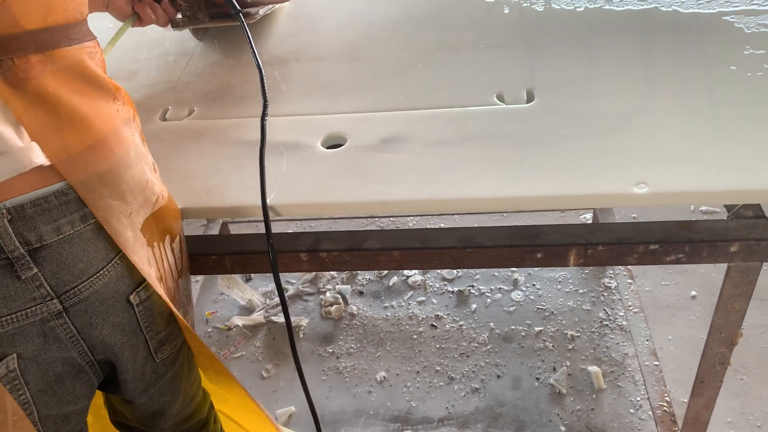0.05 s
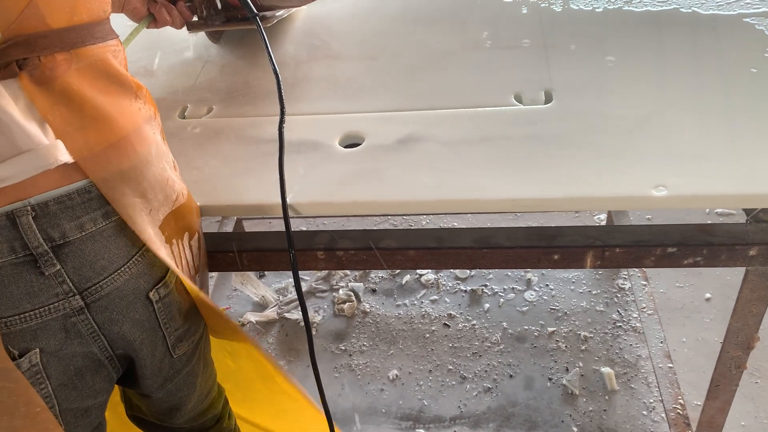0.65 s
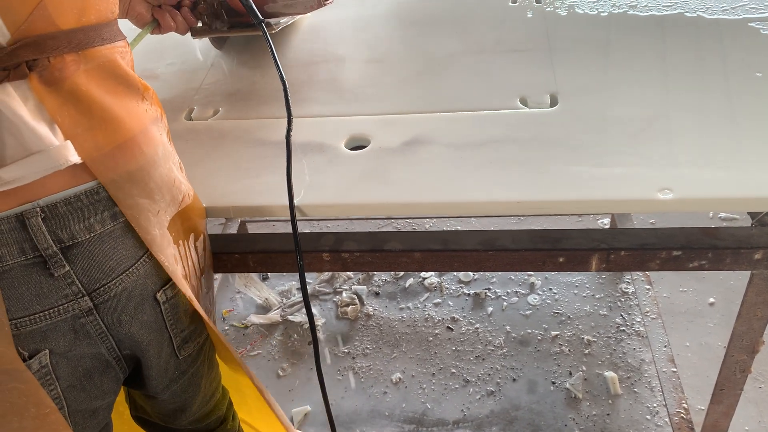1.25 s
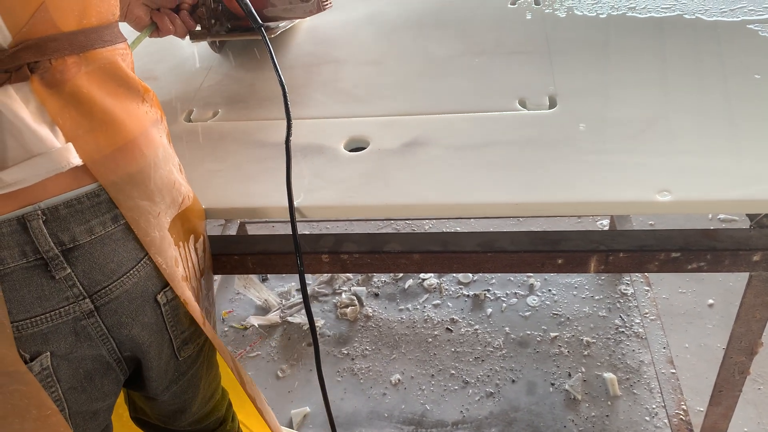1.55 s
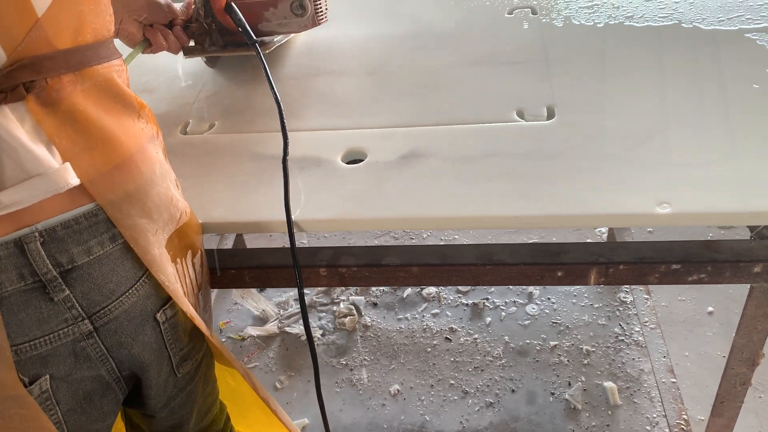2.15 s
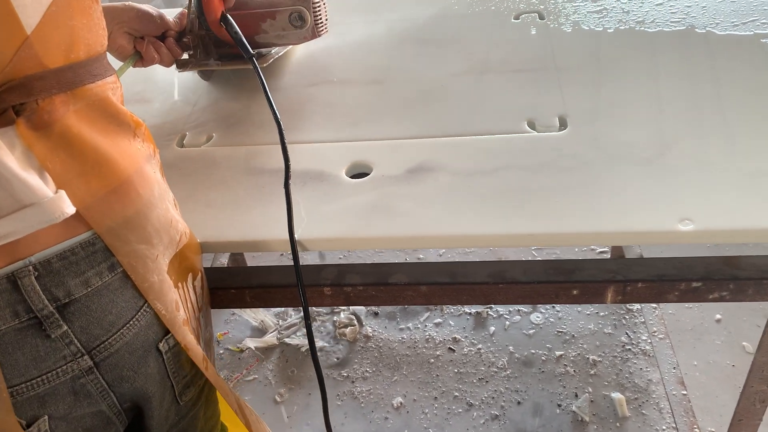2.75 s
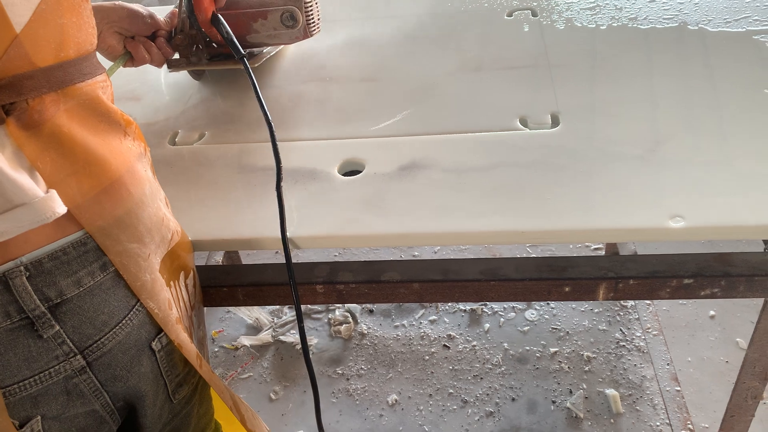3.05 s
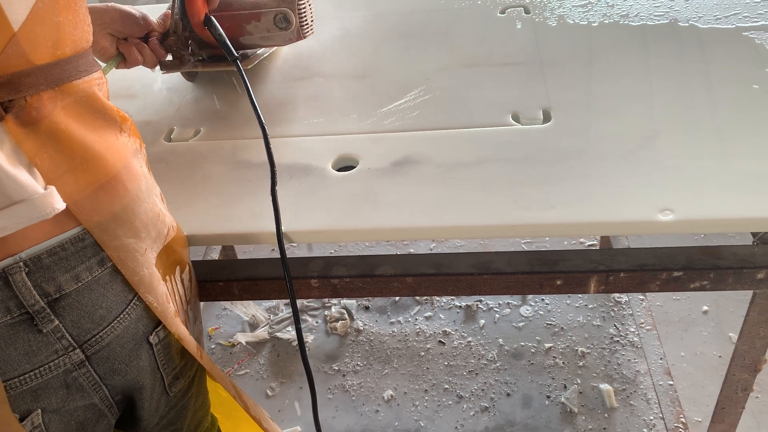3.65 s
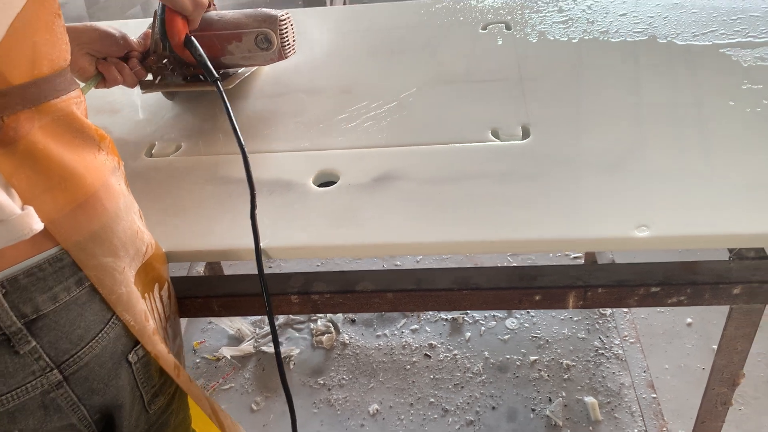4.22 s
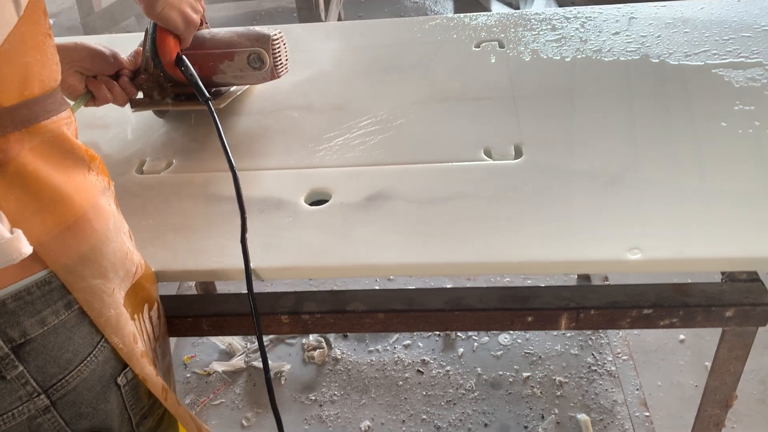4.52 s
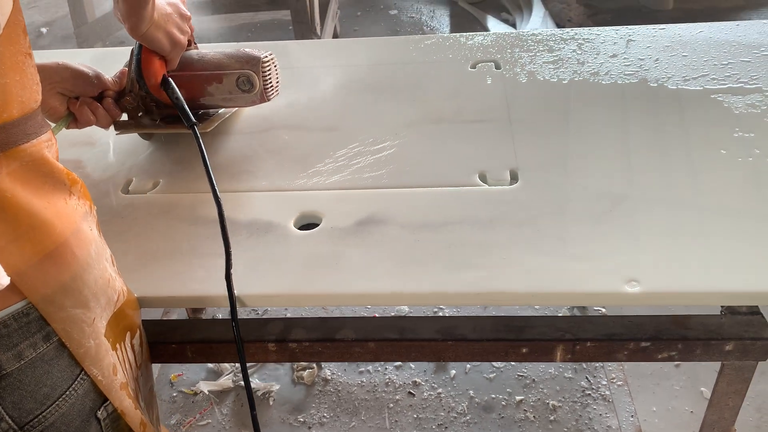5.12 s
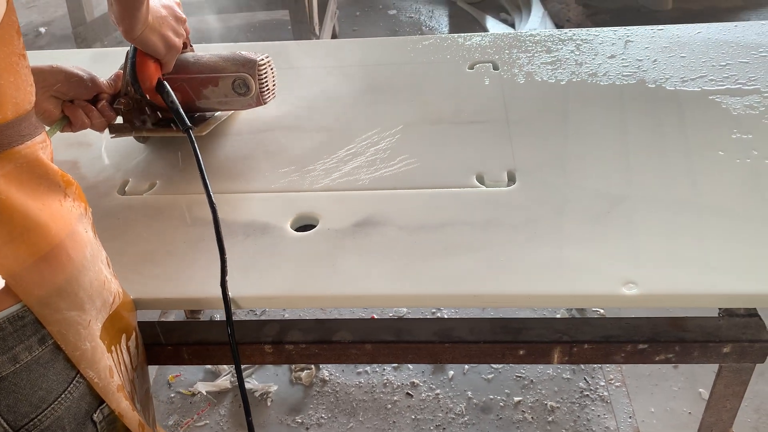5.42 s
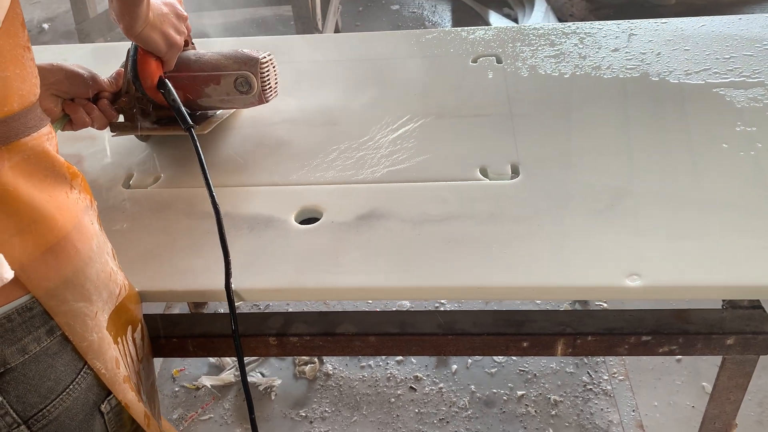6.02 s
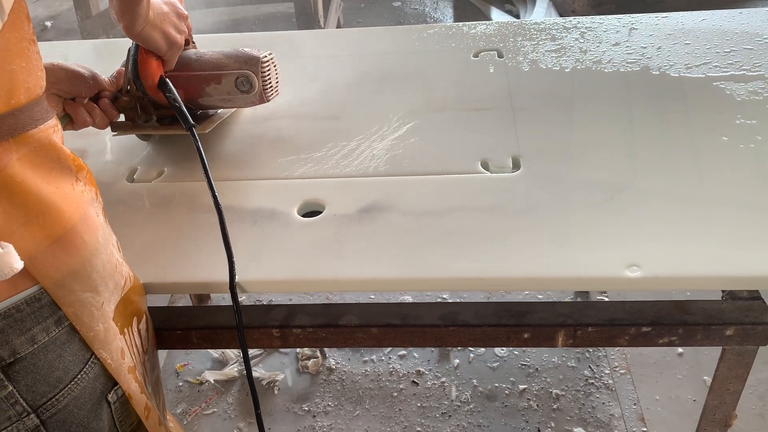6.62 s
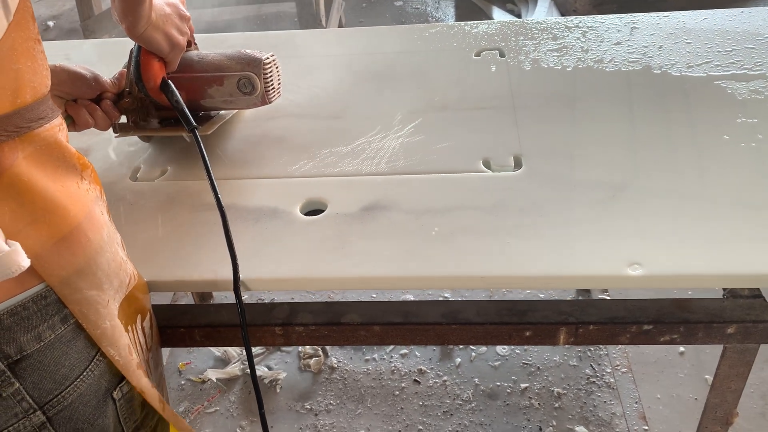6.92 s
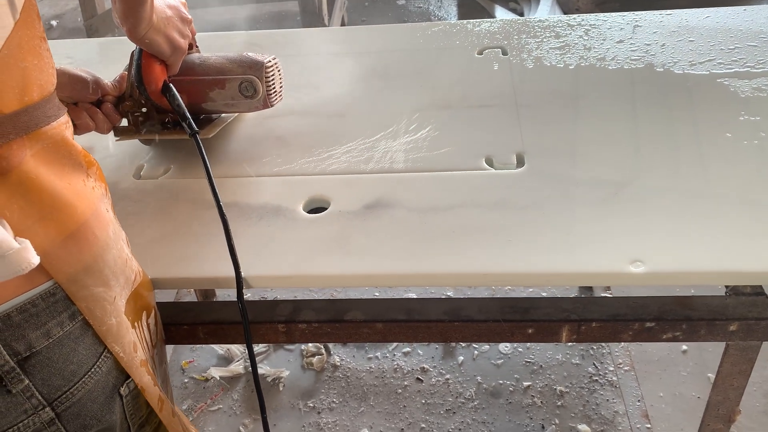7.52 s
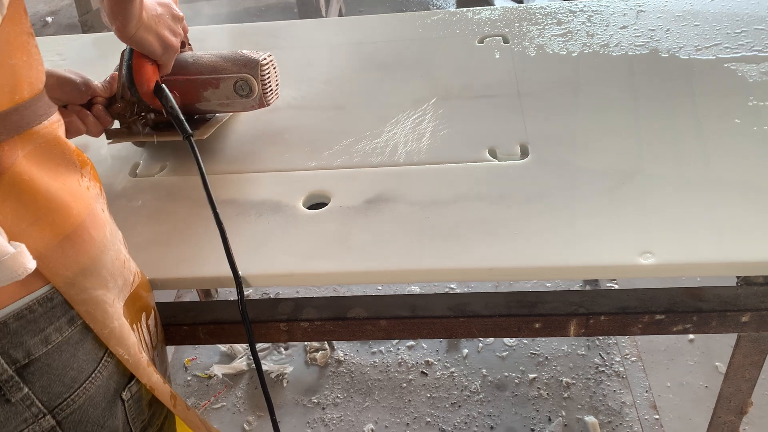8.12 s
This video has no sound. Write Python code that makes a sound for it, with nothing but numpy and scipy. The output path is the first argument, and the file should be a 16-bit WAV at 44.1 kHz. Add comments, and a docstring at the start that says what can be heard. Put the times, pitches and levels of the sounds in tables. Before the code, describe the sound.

A handheld electric cutter whines steadily as it grinds through wet glass, with a gritty hiss, high squeals and brief squeaks.

```python
"""A hand-held electric cutter pushes its diamond blade through a wet glass slab in a workshop.
Motor and gears whine on multiples of the blade speed, which sags as the cut deepens. The rim rubs the
same bumps on every turn, rasping and making blade and slot ring; grit hisses, and the blade squeals,
screeches and catches in short squeaks. Underneath sit fan rush, churning water and mains hum,
with a few soft puffs of air on the microphone early on."""
import sys
import numpy as np
from scipy import signal
from scipy.fft import rfft, irfft
from scipy.io import wavfile
from scipy.ndimage import uniform_filter1d

SR = 44100
rng = np.random.default_rng(int(sys.argv[2]) if len(sys.argv) > 2 else 0)


def to_wav(sig):
    """Store sig (one row per channel, or 1-D mono) as 16-bit WAV at the path in sys.argv[1].

    Samples outside -1..1 are clipped; the rate is SR.
    """
    pcm = np.clip(np.atleast_2d(sig), -1, 1) * 32767
    pcm = np.round(pcm).astype(np.int16)
    wavfile.write(sys.argv[1], SR, pcm.T)  # frames by channels


N = 368676
TIME = np.arange(N) / SR
FREQ = np.maximum(np.arange(N // 2 + 1) * SR / N, 1)

# blade speed (time [s], speed [turns/s])
BLADE_SPEED = [(0.0, 117.83), (0.26, 116.83), (0.46, 119.32), (0.74, 119.67), (1.0, 117.8), (1.18, 114.9),
               (1.37, 115.62), (1.49, 114.0), (1.97, 112.43), (2.09, 113.45), (2.65, 113.37),
               (2.79, 111.65), (3.02, 113.07), (3.46, 111.38), (3.88, 111.42), (4.48, 112.25),
               (4.76, 111.5), (5.06, 112.35), (5.48, 111.18), (5.69, 111.72), (5.92, 110.73),
               (6.43, 110.98), (6.99, 110.95), (7.48, 112.22), (7.96, 110.18), (8.38, 112.45)]
# feed of the tool (time [s], depth of cut [0-1])
CUT_DEPTH = [(1.0, 0.08), (1.4, 0.23), (2.5, 0.42), (3.2, 0.5), (4.1, 0.58), (4.7, 0.9)]
# motor, fan and gear tones (multiple of blade speed, level at depth 0 [dB], level at depth 1 [dB])
MOTOR_TONES = [(1, -65.5, -66), (2, -53.5, -51.5), (4, -53, -86), (5, -54.5, -80), (7, -52, -76),
               (9, -53.5, -53.5), (11, -59, -70), (12, -51, -70), (13, -51, -72), (14, -57, -56.5),
               (15, -59, -52), (17, -70, -51), (18, -59, -57), (19, -60, -66), (20, -52, -56),
               (21, -54, -65), (22, -56, -52), (23, -62, -58), (24, -55, -76), (25, -55, -58),
               (26, -51, -51), (27, -43, -53), (28, -48, -57), (29, -44, -46), (30, -54, -56),
               (31, -59, -48), (32, -61, -57), (33, -50, -55), (35, -54, -55), (36, -56, -57),
               (37, -60, -59), (38, -60, -58), (42, -70, -58), (43, -60, -62), (45, -57, -64),
               (46, -62, -59), (50, -61, -56), (52, -52, -62), (53, -57, -55), (58, -62, -49),
               (62, -59, -50), (63, -56, -53), (65, -58, -45), (66, -49, -54), (67, -53, -43),
               (69, -52, -49), (70, -50, -53), (71, -50, -47)]
# housing whistle before the bite (multiple of blade speed, level [dB])
WHISTLE_TONES = [(13, -46), (14, -42), (15, -49)]
# gear tones under load (multiple of blade speed, relative level [dB])
STRAIN_TONES = [(13, -56), (18, -55), (33, -52), (37, -52), (42, -51), (43, -57), (46, -56), (51, -51),
                (70, -46)]
# their swell as the tool is pushed (time [s], gain [dB])
STRAIN_GAIN = [(0, -40), (4.5, -34), (5.0, -8), (5.5, -7), (6.2, -39), (7.3, -9), (7.9, 1), (8.36, 2.5)]
# tone colour of grit, rim and fan (frequency [Hz], relative density [dB/Hz])
GRIT_SPECTRUM = [(2000, -73.5), (5300, -63.5), (6000, -47), (7000, -44), (8500, -45.5), (9700, -33),
                 (10900, -38.5), (11600, -45.5), (12300, -35), (12900, -39.5), (13600, -37.5),
                 (14400, -38.5), (15300, -36), (16500, -40)]
RIM_SPECTRUM = [(300, -100), (650, -90.5), (1800, -90), (2500, -86), (3300, -75), (4100, -79), (4700, -86),
                (5300, -86.5), (5700, -100), (7000, -100), (8500, -84), (11000, -69.5), (16000, -71)]
FAN_SPECTRUM = [(25, -110), (60, -85.5), (100, -90), (160, -92), (240, -82), (320, -99), (410, -82.5),
                (500, -81.5), (750, -78), (950, -78), (1300, -76.5), (2150, -82), (2700, -80), (3250, -75),
                (3800, -79), (4400, -87), (5300, -85), (9000, -105)]
# resonances of blade, slot, housing and water (frequency [Hz], half width [Hz], relative level [dB])
BLADE_MODES = [(3460, 130, -4), (3930, 220, -8), (6325, 220, 1.5)]
SQUEAL_MODES = [(10644, 430, 0)]
SLOT_MODES = [(2630, 820, -11.5), (4710, 870, -8.5), (5780, 360, -2.5), (7490, 510, 1.5), (7845, 73, 4.5)]
HOUSING_MODES = [(1724, 117, -0.69), (1661, 35, 0.58)]
WATER_MODES = [(665, 200, 0)]
# envelopes of blade ring, squeal, water and screech (time [s], relative level [dB])
RING_ENVELOPE = [(0.0, -46), (1.3, -30), (1.44, -33), (2.49, -33.5), (2.79, -39.5), (4.8, -32.5),
                 (5.8, -37.5), (7.06, -32), (8.36, -35.5)]
SQUEAL_ENVELOPE = [(0.0, -33), (0.11, -28), (0.37, -35.5), (0.49, -28.5), (2.4, -30.5), (2.7, -55),
                   (2.82, -30), (4.07, -35), (4.73, -27.5), (5.49, -29), (5.61, -26), (6.54, -27.5),
                   (7.82, -27), (8.36, -29)]
WATER_ENVELOPE = [(0, -53), (2.0, -60.5), (2.5, -52), (5.5, -52.5), (6.1, -56.5), (8.36, -57)]
SCREECH_ENVELOPE = [(0.2, -60), (0.5, -45.5), (0.9, -45), (1.25, -39.5), (1.7, -42), (2.5, -41), (2.9, -44),
                    (3.6, -45.5), (4.8, -43.5), (5.8, -51), (7.1, -44), (7.7, -51), (8.36, -52)]
# puffs of air (time [s], half length [s], level [dB])
AIR_PUFFS = [(0.02, 0.068, -48), (0.314, 0.091, -52.5), (.53, 0.065, -53), (0.77, .03, -52),
             (0.934, 0.099, -57), (1.064, .025, -57), (1.296, 0.12, -56), (1.615, 0.021, -58)]
# the blade binds and sings (start [s], end [s], multiple of blade speed, level [dB])
BLADE_BINDS = [(0.4, 1.25, 20, -45), (0.4, 1.05, 18, -49), (0.55, 0.85, 27, -41), (1.15, 1.6, 27, -44),
               (1.15, 1.65, 21, -48), (1.1, 1.45, 36, -46.5), (1.2, 1.65, 29, -42), (1.45, 2.6, 35, -49),
               (1.55, 2.55, 36, -49), (1.5, 2.4, 30, -48), (2.0, 2.65, 27, -43), (2.0, 3.1, 29, -41.5),
               (4.9, 5.15, 36, -46), (4.9, 5.15, 29, -45), (7.65, 8.36, 36, -47), (7.65, 8.05, 58, -42),
               (7.65, 8.0, 67, -41), (7.9, 8.36, 27, -45.5), (8.2, 8.4, 29, -42)]
# the blade catches and squeaks (time [s], relative peak level [dB])
BLADE_CATCHES = [(0.4855, -13), (0.637, -16), (0.8565, -18), (1.4231, -11), (4.1358, -13), (5.7407, -17),
                 (5.793, -13), (6.187, -7.5), (7.551, -10), (7.6834, -22), (7.8964, -16), (8.087, -14)]
# two microphone ports (frequency [Hz], direct share [0-1], left lag [rad], left minus right [dB])
MIC_PORTS = [(60, 1, 0.3, 0.3), (149, 0.85, 0.5, -1), (260.3, 0.6, -3.5, 1.5), (518, 0.67, 0.5, -0.5),
             (535, 0, -1, -3.5), (730, 0.88, -1.62, 1), (1380, 0.61, -2, -1), (1770, 0.44, -1.6, 2),
             (2050, 0.7, -3.2, -1), (2450, 0.7, -3.7, 0), (3150, 0.6, -3.5, -0.5), (3700, 0.55, -5.2, -3),
             (4300, 0.6, -6.2, -1), (5150, 0.4, -6.6, -4), (5550, 0.4, -4.6, -4.5),
             (5850, 0.85, -5.9, -1.5), (6400, 0.98, -6.3, 0), (7100, 0.7, -6.7, 4), (7400, 0.6, -5.1, 5),
             (7900, 0.92, -3.6, 1.3), (11030, 1, -0.5, -1), (13070, 0.93, 3, 1), (15970, 0.97, 5.5, -1.5)]

BITE_S, BITE_RISE_S = 0.17, 0.27  # the rim skims the glass, then bites
# gains that ride the feed (skimming [dB], bitten at depth 0 [dB], at depth 1 [dB])
HISS_DB, RASP_DB = (-26, -24, -28), (-0.5, -5, 2.5)
SLOT_DB, HOWL_DB = (-58, -40.5, -31.5), (-50, -52, -48.5)
SKIM_DB = -4  # blade ring and upper gear whine sit lower before the bite


def undb(db):
    """Decibels to gain."""
    return 10 ** (np.asarray(db) / 20)


def curves(table):
    """One envelope per value column of a timed table, in straight ramps."""
    times, *columns = np.transpose(table)
    return [np.interp(TIME, times, column) for column in columns]


def unit(x):
    """Scale to rms 1."""
    return x / np.sqrt(np.mean(x ** 2))


def noise():
    """White noise of rms 1."""
    return rng.standard_normal(N)


def drift(rate_hz):
    """Smooth random modulation of rms 1, mostly slower than rate_hz."""
    return unit(irfft(rfft(noise()) / (1 + (FREQ / rate_hz) ** 2), N))


def turn_drift(turns):
    """Random modulation of rms 1 that ramps to a new value on every turn."""
    draws = rng.standard_normal(2048)
    return unit(np.interp(turns, np.arange(draws.size), draws))


def swell(peak_s, half_s):
    """Bell-shaped envelope."""
    return np.exp(-np.minimum(((TIME - peak_s) / half_s) ** 2, 20))


def colour(x, spectrum):
    """EQ that gives white sound of rms 1 a spectrum in dB per Hz."""
    hz, db = np.transpose(spectrum)
    gain = undb(np.interp(np.log(FREQ), np.log(hz), db))
    return irfft(rfft(x) * gain, N) * np.sqrt(SR / 2)


def resonate(x, modes):
    """Drive a bank of steep resonances; rms 1."""
    response = sum(undb(db) / (1 + 1j * (FREQ - hz ** 2 / FREQ) / (2 * half_width)) ** 2
                   for hz, half_width, db in modes)
    return unit(irfft(rfft(x) * response, N))


def feed():
    """How firmly the rim has bitten and how deep it is, both 0-1."""
    bite = np.clip((TIME - BITE_S) / BITE_RISE_S, 0, 1)
    return bite, np.clip(curves(CUT_DEPTH)[0], 0, 1)


def feed_gain(levels_db):
    """A layer's fader as the blade goes from skimming to biting to cutting deep."""
    skim_db, bite_db, deep_db = levels_db
    bite, depth = feed()
    return undb(skim_db + bite * (bite_db - skim_db) + depth * (deep_db - bite_db))


def motor_partials(upper_above=17):
    """Motor, gears and housing whistle, locked to the shaft, as (multiple, level [dB])."""
    bite, depth = feed()
    skim_db = SKIM_DB * (1 - bite)
    strain_db = curves(STRAIN_GAIN)[0]
    running = [(order, shallow_db + depth * (deep_db - shallow_db) + skim_db * (order > upper_above))
               for order, shallow_db, deep_db in MOTOR_TONES]
    whistle = [(order, db - 60 * bite ** 3) for order, db in WHISTLE_TONES]
    strain = [(order, db + strain_db) for order, db in STRAIN_TONES]
    return running + whistle + strain


def shaft_tone(turns, order, db, sway_rad=0.45, rattle_rad=0.3, waver_db=2.6):
    """One multiple of the shaft in stereo; higher ones sway, rattle and waver more as the tool moves."""
    unsteady = min(order / 30, 1)
    mean_hz = order * turns[-1] / TIME[-1]
    port_hz, _, port_lag, port_db = np.transpose(MIC_PORTS)
    pan_db = np.interp(mean_hz, port_hz, port_db)
    lag = np.interp(mean_hz, port_hz, port_lag) + sway_rad * unsteady * turn_drift(turns / 45)
    phase = 2 * np.pi * (order * turns + rng.random()) + rattle_rad * unsteady * turn_drift(turns)
    gain = undb(db + waver_db * unsteady * turn_drift(turns / 5))
    return np.sqrt(2) * gain * np.sin([phase - lag, phase]) * undb([[pan_db / 2], [-pan_db / 2]])


def whine(turns, partials):
    """Voice each multiple of the shaft once, with the power of all that drive it."""
    power = {}
    for order, db in partials:
        power[round(order)] = power.get(round(order), 0) + undb(db) ** 2
    return sum(shaft_tone(turns, order, 10 * np.log10(total)) for order, total in power.items())


def rim_bumps(turns, wear_turns=9, points=320, steps=1024):
    """Bumps round the rim come back on every turn and slowly wear into a new pattern."""
    rows = int(turns[-1]) + 2
    fresh = signal.resample_poly(rng.standard_normal(rows * points), steps, points).reshape(rows, steps)
    worn = signal.lfilter([1], [1, -np.exp(-1 / wear_turns)], fresh, axis=0)
    return np.interp(turns * steps, np.arange(worn.size), unit(worn).ravel())


def blade_pressure(turns, wobble=0.17, flutter_db=0.92, sway_db=0.5):
    """The rim runs out of true once a turn, and the hand feeds unevenly."""
    runout = unit(sum(np.cos(2 * np.pi * (k * turns + rng.random())) / np.sqrt(k) for k in range(1, 7)))
    return (1 + wobble * runout) * undb(flutter_db * drift(63) + sway_db * drift(27))


def grit_hiss(pressure, spread_db=1.75):
    """Dense tiny fractures of glass, some larger than the rest, blur into a bright hiss."""
    fractures = unit(noise() * undb(spread_db * np.minimum(rng.exponential(size=N), 6)))
    return colour(fractures * pressure, GRIT_SPECTRUM) * feed_gain(HISS_DB)


def blade_ring(rim, trim_db=-2.5):
    """The rim's rub carries loose grit, swells unevenly and rings the free blade."""
    bite, _ = feed()
    rub = (rim + 0.45 * noise()) * undb(drift(20))
    level_db = curves(RING_ENVELOPE)[0] + trim_db + SKIM_DB * (1 - bite)
    return resonate(rub, BLADE_MODES) * undb(level_db)


def slot_grind(rim):
    """Bumps and grit drive the slot's resonances, louder as the cut deepens."""
    return resonate(rim + 1.1 * noise(), SLOT_MODES) * feed_gain(SLOT_DB) * undb(1.5 * drift(25))


def blade_squeal(rim, pressure, trim_db=-1):
    """A high blade resonance builds and breaks off many times a second."""
    chatter = unit(undb(0.47 * drift(75) + 0.53 * drift(5.2))) * pressure
    squeal = resonate(noise() + 0.47 * rim, SQUEAL_MODES)
    return squeal * chatter * undb(curves(SQUEAL_ENVELOPE)[0] + trim_db)


def rim_rasp(rim):
    """The bumps scrape the glass in a broad, flickering buzz."""
    return colour(rim, RIM_SPECTRUM) * undb(2 * drift(22)) * feed_gain(RASP_DB)


def fan_rush():
    """Fan air rushes through the housing and howls in its resonances."""
    howl = resonate(noise(), HOUSING_MODES) * feed_gain(HOWL_DB)
    return colour(noise(), FAN_SPECTRUM) + howl


def water_churn():
    """Water churns in the slot: a surging band of low-mid noise."""
    return resonate(noise(), WATER_MODES) * undb(curves(WATER_ENVELOPE)[0] + 2.2 * drift(10))


def mains_hum(hz=201.6, level_db=-65.5, lag_rad=1.2):
    """The workshop's faint, steady mains hum, in stereo."""
    phase = 2 * np.pi * hz * TIME
    return np.sqrt(2) * undb(level_db + drift(4.8)) * np.sin([phase - lag_rad, phase])


def air_puffs():
    """Each puff of air swells and dies as a low thud on the microphone."""
    envelope = sum(undb(db) * swell(s, half_s) for s, half_s, db in AIR_PUFFS)
    return resonate(noise(), [(81.5, 46, 0)]) * envelope


def screech_partials(speed_hz, mode_hz=6345, width_hz=190):
    """The five multiples nearest a blade mode screech as they near it, as (multiple, level [dB])."""
    level_db = curves(SCREECH_ENVELOPE)[0]
    nearest = round(mode_hz / speed_hz.mean())
    return [(order, level_db - 10 * np.log10(1 + (2 * (order * speed_hz - mode_hz) / width_hz) ** 4))
            for order in range(nearest - 2, nearest + 3)]


def binding_partials(fade_s=0.15):
    """The blade binds and sings in notes that fade in and out, as (multiple, level [dB])."""
    notes = []
    for start, end, order, db in BLADE_BINDS:
        fade = np.clip(0.5 + np.minimum(TIME - start, end - TIME) / fade_s, 1e-3, 1)
        notes.append((order, db + 20 * np.log10(fade)))
    return notes


def catch_squeaks(half_s=0.0015, trim_db=-3, pitch_hz=10760, scatter_hz=130):
    """The blade grabs in its slot and squeaks for a few milliseconds."""
    envelope = sum(undb(db + trim_db) * swell(s + half_s, half_s) for s, db in BLADE_CATCHES)
    squeak_hz = pitch_hz + scatter_hz * drift(298)
    return envelope * np.sin(2 * np.pi * np.cumsum(squeak_hz) / SR)


def flatten(response, bins=1400):
    """Level a response on average and keep its fine ripple."""
    return response / np.sqrt(uniform_filter1d(np.abs(response) ** 2, bins))


def reflections(near_t60_s=0.054, tail_t60_s=0.39, tail_db=-13):
    """Frequency response of a ragged slap off bench and floor, then the workshop's faint tail."""
    near = undb(-60 * np.minimum(TIME / near_t60_s, 2))
    tail = undb(tail_db - 60 * np.minimum(TIME / tail_t60_s, 2))
    return flatten(rfft(noise() * (near + tail)))


def stereo_image(x):
    """The direct sound reaches the two ports out of step; each gets its own reflections."""
    hz, *columns = np.transpose(MIC_PORTS)
    direct, lag, pan_db = (np.interp(FREQ, hz, column) for column in columns)
    direct = np.clip(direct, 0, 1)
    left = flatten(np.sqrt(direct) * np.exp(-1j * lag) + np.sqrt(1 - direct) * reflections())
    right = flatten(np.sqrt(direct) + np.sqrt(1 - direct) * reflections())
    return irfft(rfft(x) * [left * undb(pan_db / 2), right * undb(-pan_db / 2)], N)


def scene(jitter=0.00068):
    """One shaft angle drives the whine, the screech and the cut, over a bed of air, water and hum."""
    speed_hz = curves(BLADE_SPEED)[0] * (1 + jitter * drift(15.9))
    turns = np.cumsum(speed_hz) / SR
    rim = rim_bumps(turns)
    pressure = blade_pressure(turns)
    cut = grit_hiss(pressure) + blade_ring(rim) + slot_grind(rim)
    cut += blade_squeal(rim, pressure) + rim_rasp(rim) + catch_squeaks()
    bed = fan_rush() + water_churn() + air_puffs()
    partials = motor_partials() + screech_partials(speed_hz) + binding_partials()
    return stereo_image(cut + bed) + whine(turns, partials) + mains_hum()


def record(dry, cutoff_hz=15700):
    """A steep low-pass shaves off the top."""
    return signal.sosfilt(signal.ellip(12, 0.1, 80, cutoff_hz, fs=SR, output="sos"), dry)


dry = scene()
out = record(dry)
to_wav(out)
```